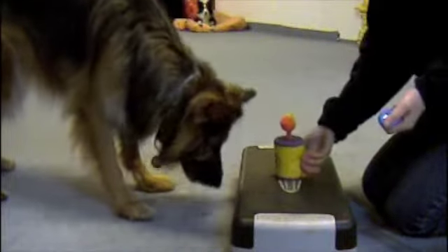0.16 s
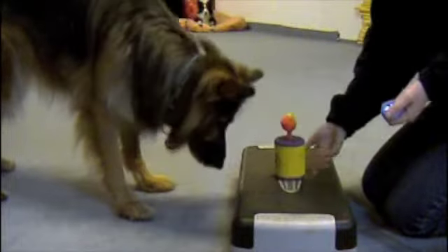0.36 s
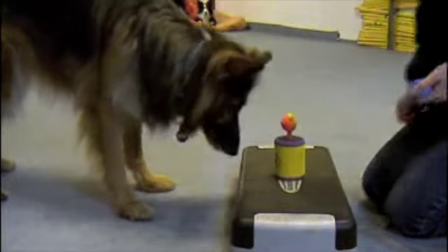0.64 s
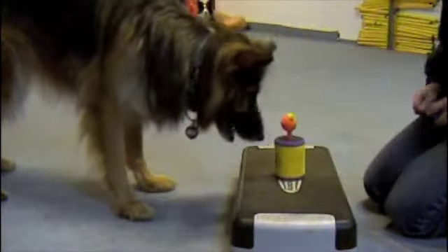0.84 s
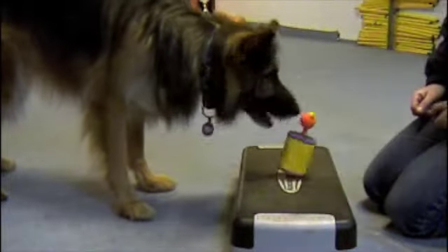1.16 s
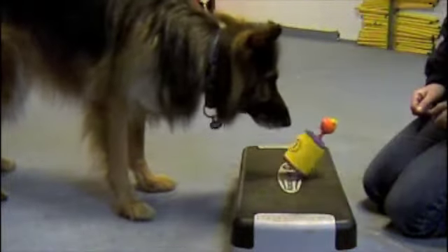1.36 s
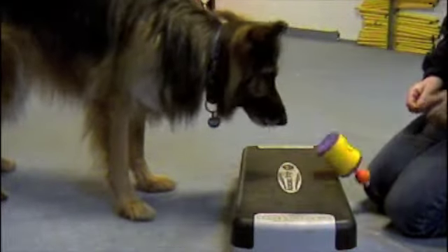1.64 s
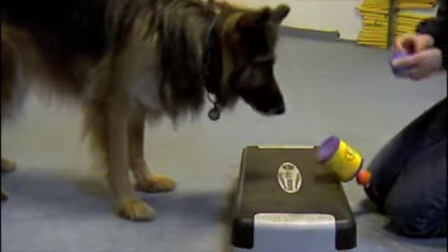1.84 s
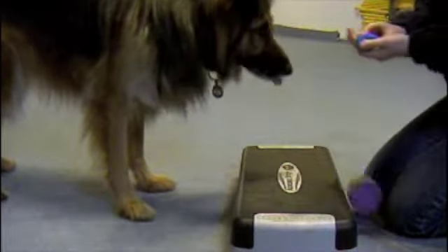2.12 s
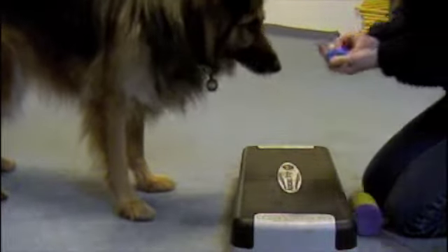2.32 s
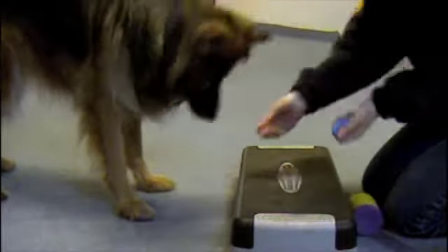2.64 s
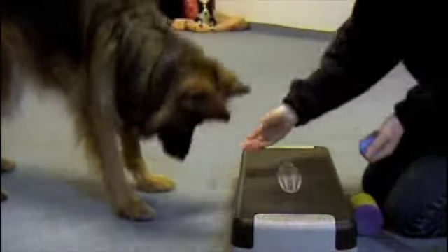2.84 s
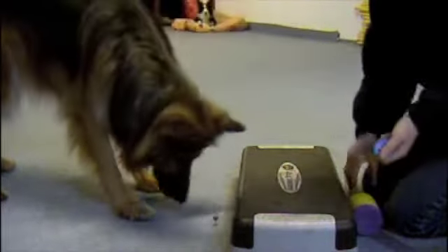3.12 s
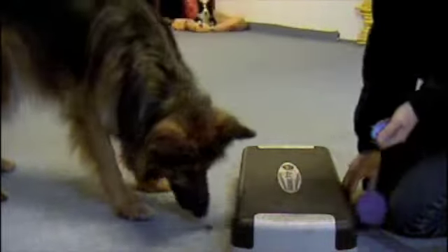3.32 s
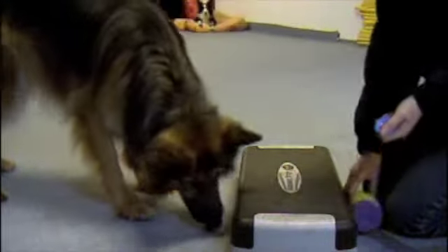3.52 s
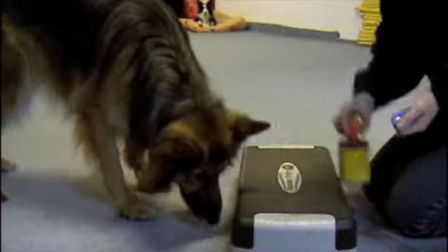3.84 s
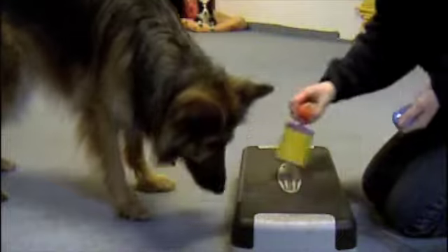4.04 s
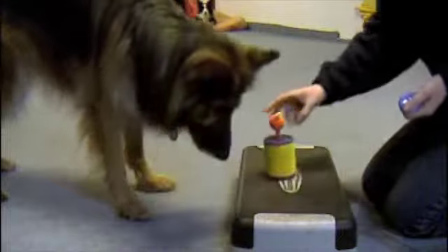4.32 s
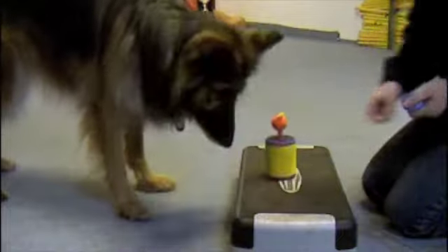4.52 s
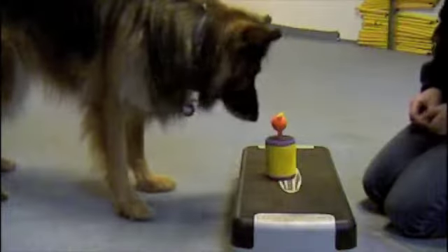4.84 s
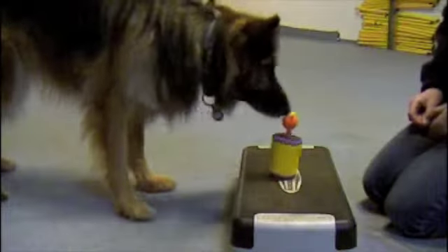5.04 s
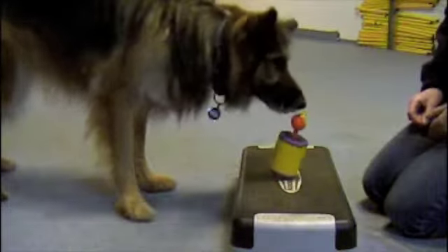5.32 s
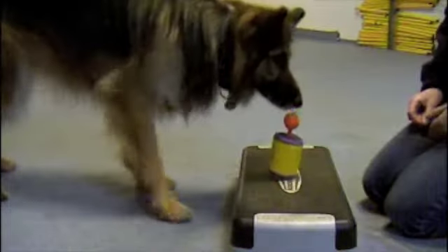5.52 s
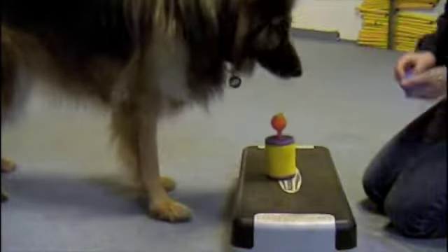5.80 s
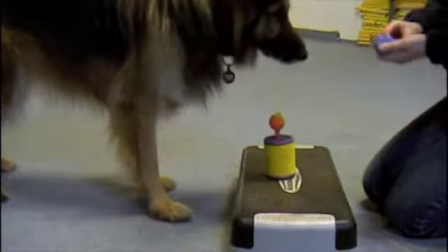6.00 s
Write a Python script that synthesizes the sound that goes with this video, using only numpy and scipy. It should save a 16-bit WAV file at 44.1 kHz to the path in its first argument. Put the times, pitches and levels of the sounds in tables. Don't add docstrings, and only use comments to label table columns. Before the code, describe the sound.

Quiet rustling, claw ticks and light plastic scuffs sit over steady camcorder hiss and faint whine. Twice a handheld clicker cuts through with a very loud, bright press and slightly softer release, distorting briefly and leaving a short echoing tail. Between them a light hollow toy topples, drops and is replaced on a plastic step, and a collar tag jingles faintly. Everything is near a stereo microphone in a reverberant room.

```python
import sys
import numpy as np
from scipy import signal
from scipy.fft import rfft, irfft
from scipy.io import wavfile

SR = 44100
rng = np.random.default_rng(int(sys.argv[2]) if len(sys.argv) > 2 else 0)


def volts(x):
    e = np.asarray(x, float) / 20
    return 10 ** e


def bounce(signal):
    frames = np.transpose(np.atleast_2d(signal))
    limited = np.clip(frames, -1, 1)
    pcm = np.round(limited * 32767).astype(np.int16)
    wavfile.write(sys.argv[1], SR, pcm)


N = 271682

# f/Hz, density/dB
HISS_MID = [(18, -12), (30, 14.5), (55, -20), (295, -2.5), (801, -3), (889, -7), (988, -7), (1500, -6),
            (3980, -15), (5590, -14), (6380, -23), (11100, -28), (16000, -34)]
HISS_SIDE = [(18, -27), (30, -5), (43, -7), (138, 6.5), (259, 6), (913, -7), (1040, -10), (1190, -8.5),
             (4190, -28.5), (5590, -26), (6380, -27), (13300, -34), (16000, -48)]
HISS_MID_DB, HISS_SIDE_DB = -54.5, -48
DRUM_HZ = 300
DRUM_ORDERS = [1, 3, 5, 6, 11, 13, 14, 15, 16, 17, 18, 19, 20, 23]
WHINE = [(-70, -81), (-63.5, -74), (-68.5, -82), (-70, -90), (-72, -65), (-77, -88), (-86.5, -69),
         (-69, -72), (-72, -80), (-70.5, -88), (-68, -58), (-69.5, -163.5), (-77.5, -69), (-84.5, -82)]
CAPSTAN_HZ = [2902, 3451, 3775, 4075, 4400, 4700, 5227, 5372, 5480, 5819]
CAPSTAN_DB = -78
# f/Hz, width/Hz, rms/dB
GEAR = [(5550, 210, -85.5), (10720, 580, -79), (8790, 200, -84)]

# t/s, level/dB
RUSTLE = [(0.0, -55.5), (0.9, -54), (1.5, -59), (2.6, -61), (3.3, -60), (3.5, -58), (4.8, -55.5),
          (5.1, -58.5), (6.16, -60.5)]
# f/Hz, density/dB
CLOTH = [(150, -15.5), (500, -0.5), (1200, 1.5), (2500, -3.5), (5000, -8.5), (12000, -28.5)]

# t/s, peak/dB, f/Hz, bright edge/dB
CLAWS = [(0.1955, -33.5, 2010, -49), (0.2188, -41, 1810, -45), (0.491, -46, 1800, -39.5),
         (0.5427, -35.5, 2170, -49), (0.5594, -35, 2340, -49), (0.5794, -35, 2080, -58),
         (0.7297, -37, 1910, -48), (0.8225, -37.5, 2060, -41), (0.832, -36, 1050, -40),
         (0.9179, -42, 1600, -46), (1.1523, -37.5, 3690, -54), (1.2823, -38, 2480, -55),
         (1.3204, -34.5, 1970, -48)]
TOY_TICKS = [(2.2095, -40, 3230, -65), (2.222, -36, 2900, -42), (2.2276, -34, 1380, -33),
             (2.2463, -30, 1700, -65), (3.4965, -37.5, 1340, -52), (3.5652, -39, 1610, -52),
             (3.751, -40, 2870, -44), (3.862, -30, 1850, -52), (3.8628, -38, 2720, -55),
             (3.97, -39, 1570, -44), (3.9855, -30.5, 1530, -39), (4.185, -44, 1020, -56),
             (4.253, -34, 1500, -52), (4.2643, -29.5, 1514, -44), (4.3757, -36, 1540, -57),
             (4.409, -39, 1570, -74)]
# t/s, peak/dB, bright edge/dB
TAG = [
    (4.6585, -29.5, -45),
    (4.6766, -34, -56),
    (4.708, -42, -62),
    (4.788, -31.5, -48),
    (4.803, -36.5, -59),
]
TAG_HZ = 3370
TICK_T60_S, FIZZ_DB = 0.028, -17
TICK_ROOM_DB, TICK_ECHO_DB = -9, -12

# t/s, length/s, centre f/Hz, level/dB
SCUFFS = [(.49, 0.062, 680, -55.5), (.84, 0.064, 1050, -54.5), (3.289, 0.12, 640, -54.5),
          (3.489, 0.11, 3700, -59.5), (4.195, 0.067, 348, -53), (4.26, 0.2, 1570, -54.5),
          (4.317, 0.079, 340, -57), (4.349, 0.037, 676, -53.5), (4.671, 0.054, 3320, -54)]
SCUFF_WIDTH = 1.15

# t/s, peak/dB, favoured f/Hz
KNOCKS = [(1.11, -53.5, 220), (1.594, -24.5, 318), (1.598, -35, 650), (1.644, -36, 348), (1.672, -43, 220),
          (2.248, -32, 271), (2.299, -48, 300), (2.329, -44, 300), (3.276, -39, 675), (3.58, -45, 240),
          (3.873, -51.5, 220), (3.984, -49.5, 674), (4.189, -42, 255), (4.2, -44, 330), (4.289, -43.5, 720),
          (6.042, -54, 230)]
# f/Hz, t60/s
BODY = [(228, 0.068), (330, 0.094), (505, 0.043), (688, 0.053)]
KNOCK_PAN_DB = [-9, -1, -1, 1]
KNOCK_NARROW_DB_PER_OCTAVE = 9
KNOCK_ROOM_DB, KNOCK_ECHO_DB = -7, -2.5

# t/s, peak/dB, left and right input charge under overload/dB
PRESS = [
    (1.4646, 6.15, -34, -28),
    (5.3652, 6.6, -35, -28.5),
]
RELEASE = [
    (1.71, 2.3, -27, -29),
    (5.69735, 2.86, -26, -29),
]
# f/Hz, level/dB, t60/s
PRESS_MODES = [(2210, -21.5, 0.016), (3010, -10.5, 0.011), (3570, -4.5, 0.013), (3903, -4, 0.0068),
               (4140, -1.5, 0.02), (4405, -3.5, 0.012), (4770, 2, 0.0067), (5750, -1, 0.004),
               (6670, -18.5, 0.015), (7730, -5.5, 0.0033), (10100, -16, 0.01), (11500, 7, 0.0016),
               (15500, -54, 0.0033)]
RELEASE_MODES = [(1990, -22.5, 0.0096), (2960, -11.5, 0.005), (3210, -11, 0.012), (3566, 0, 0.011),
                 (3740, -7.5, 0.007), (4500, -1, 0.004), (5300, -5, 0.0052), (5850, -8.5, 0.0057),
                 (6950, -16, .007), (9100, -19, 0.01), (10700, -19.5, 0.0064), (12050, -14, 0.0051),
                 (13600, -21, .002)]
# f/Hz, density/dB
PRESS_ALL_ROUND = [(590, -74), (1000, -23), (1240, -26.5), (1480, -14), (1710, -14), (2010, -16),
                   (2530, -11), (4100, 6), (5030, -6.5), (5200, -17.5), (6600, -12.5), (6800, -18.5),
                   (10400, -26), (14300, -40), (15500, -73)]
RELEASE_ALL_ROUND = [(590, -75), (1000, -34), (1430, -21.5), (1710, -11), (2530, -8), (3610, 7), (4000, -6),
                     (5100, -9), (6150, -9), (7400, -33), (8940, -22), (12500, -34.5), (13500, -49),
                     (14800, -58), (15500, -91)]
# f/Hz, level/dB, t60/s
TONGUE_RING = [
    (4115, -5, .012),
    (3620, -7, .009),
]
CRACK_DB, CRACK_HZ = -29, 11200
RELEASE_ECHO_DB = -12

# delay/ms, level/dB, left minus right/dB
ECHOES = [(6.61, -10, 4), (8.22, -11, 3), (11.37, -9, -1), (14.4, -8, 0), (16.57, -11, -2), (18.36, -14, 1),
          (20.35, -12, 3), (23.36, -13.5, 1.5), (26.4, -16, 3), (31.17, -12.5, 2), (33.24, -14, -3),
          (39.5, -18, 3), (54, -19, 0.5), (62.9, -15, -0.5)]
ECHO_CUT_HZ = 6600
# f/Hz, t60/s
ROOM_T60 = [(200, 0.54), (700, 0.66), (1500, 0.9), (3500, 0.74), (6000, 0.57), (10000, 0.39),
            (15000, 0.326)]
# f/Hz, side minus mid/dB
ROOM_SIDE = [(200, 3), (700, -15), (1300, -24), (2400, -12), (4400, -9), (8000, -3), (15000, 2)]
# f/Hz, level/dB
ROOM_COLOUR = [(200, -1.5), (700, -8.5), (1500, 3), (3500, 1), (7000, 1.5), (15000, 2.5)]
ROOM_DB, ROOM_RISE_S = -30, 0.0054

BASS_CUT_HZ, BALANCE_DB = 52, -1.42
CLIP_LEVEL, COUPLING_HZ, CUTOFF_HZ = 0.87, 1.51, 14000
JOLT_DB, JOLT_S = -32.5, 0.00243


def rms_one(x):
    return x / np.sqrt(np.mean(x ** 2) + 1e-20)


def at_hz(points, hz):
    table_hz, values = np.transpose(points)
    return np.interp(np.log(hz + 1), np.log(table_hz), values)


def filtered(x, order, hz, kind):
    return signal.sosfilt(signal.butter(order, hz, kind, fs=SR, output="sos"), x)


def drift(rate_hz):
    pole = np.exp(-80 * np.pi * rate_hz / SR)
    white = rng.standard_normal(N // 40 + 2002)
    slow = signal.lfilter([1], [1, -2 * pole, pole * pole], white)[2000:]
    return np.interp(np.arange(N) / 40, np.arange(len(slow)), rms_one(slow))


def coloured(spectrum):
    hz = np.fft.rfftfreq(N, 1 / SR)
    white = rng.standard_normal(N)
    return rms_one(irfft(rfft(white) * volts(at_hz(spectrum, hz)), N))


def add(track, start_s, sound):
    i = round(start_s * SR)
    track[..., i:i + sound.shape[-1]] += sound[..., :N - i]


def ringing(hz, db, t60_s, rise_s):
    t = np.arange(round(t60_s * SR)) / SR
    envelope = volts(db - 60 * t / t60_s) * (1 - np.exp(-t / rise_s))
    return envelope * np.sin(2 * np.pi * hz * t)


def stereo(mid, side):
    return np.array([mid + side, mid - side])


def recorder_noise():
    t = np.arange(N) / SR
    mid = volts(HISS_MID_DB) * coloured(HISS_MID)
    side = volts(HISS_SIDE_DB) * coloured(HISS_SIDE)
    wobble = [drift(2.9), drift(8.6), drift(7.5)]
    lines = [(order * DRUM_HZ, *db) for order, db in zip(DRUM_ORDERS, WHINE)]
    lines += [(hz, CAPSTAN_DB, CAPSTAN_DB - 10) for hz in CAPSTAN_HZ]
    phases = rng.uniform(0, 2 * np.pi, (len(lines), 2))
    for k, ((hz, mid_db, side_db), phase) in enumerate(zip(lines, phases)):
        turn = 2 * np.pi * hz * t
        height = np.sqrt(2) * volts(2.3 * wobble[k % 3])
        mid = mid + height * volts(mid_db) * np.sin(turn + phase[0])
        side = side + height * volts(side_db) * np.sin(turn + phase[1])
    beat = 1 + 0.37 * np.cos(2 * np.pi * DRUM_HZ * t)
    for hz, width_hz, db in GEAR:
        band_hz = [hz - width_hz / 2, hz + width_hz / 2]
        noise = filtered(rng.standard_normal((2, N)), order=1, hz=band_hz, kind="band")
        gear = volts(db) * beat * rms_one(noise)
        mid, side = mid + gear[0], side + gear[1]
    return stereo(mid, side)


def rustle():
    s, db = np.transpose(RUSTLE)
    level_db = np.interp(np.arange(N) / SR, s, db) + 1
    gain = volts(level_db + 2.0 * drift(10.0))
    return stereo(gain * coloured(CLOTH), 0.4 * gain * coloured(CLOTH))


def ticks():
    out, t = np.zeros(N), np.arange(round(SR / 20)) / SR
    rows = CLAWS + TOY_TICKS + [(s, db, TAG_HZ, edge_db) for s, db, edge_db in TAG]
    noise = rng.standard_normal((len(rows), 3, len(t)))
    for (s, db, hz, edge_db), (scratch, crisp, fizz) in zip(rows, noise):
        scratch = filtered(scratch, order=2, hz=[hz * 0.51, hz * 1.5], kind="band")
        crisp = filtered(crisp, order=2, hz=[3500, 8000], kind="band")
        fizz = filtered(fizz, order=2, hz=[8000, 14000], kind="band")
        t60_s = TICK_T60_S * np.sqrt(2000 / hz)
        add(out, s, ringing(hz, db - 3.5, t60_s, rise_s=0.00072))
        add(out, s, volts(db + 1.0 - 55 * t / TICK_T60_S) * scratch)
        add(out, s, volts(edge_db + 4.5 - 60 * t / 0.011) * (crisp + volts(FIZZ_DB) * fizz))
    return out * volts([[-0.3], [0.3]])


def scuffs():
    out, lumps = np.zeros(N), volts(1.8 * drift(40))
    noises = rng.standard_normal((len(SCUFFS), SR // 2))
    for (s, length_s, hz, db), noise in zip(SCUFFS, noises):
        t = np.arange(round(2 * length_s * SR)) / SR
        band_hz = [hz / SCUFF_WIDTH, hz * SCUFF_WIDTH]
        rub = rms_one(filtered(noise, order=2, hz=band_hz, kind="band"))[:len(t)]
        envelope = (1 - np.exp(-t / 0.0054)) / (1 + (t / length_s) ** 6)
        add(out, s, volts(db) * rub * envelope)
    return out * lumps


def knocks():
    out, t = np.zeros((2, N)), np.arange(round(SR / 20)) / SR
    noise = rng.standard_normal((len(KNOCKS), len(t)))
    slaps = filtered(noise, order=2, hz=[170, 1000], kind="band")
    detunes = rng.normal(1, 0.06, (len(KNOCKS), 4))
    for (s, db, favoured_hz), detune, slap in zip(KNOCKS, detunes, slaps):
        add(out, s, slap * volts(db + 6 - 60 * t / 0.078))
        for (hz, t60_s), pan_db, factor in zip(BODY, KNOCK_PAN_DB, detune):
            loss_db = KNOCK_NARROW_DB_PER_OCTAVE * abs(np.log2(hz / favoured_hz))
            mode = ringing(hz * factor, db - loss_db + 8, t60_s, rise_s=0.0019)
            add(out, s, volts([[pan_db / 2], [-pan_db / 2]]) * mode)
    return filtered(out + 1e-18, order=4, hz=138, kind="high")


def clicker():
    direct, all_round = np.zeros(N), np.zeros(N)
    hz_axis = np.fft.rfftfreq(512, 1 / SR)
    crack = filtered(np.eye(1, 64)[0], order=2, hz=CRACK_HZ, kind="high")
    shapes = ((PRESS, PRESS_MODES, PRESS_ALL_ROUND, 21.5, TONGUE_RING[0]),
              (RELEASE, RELEASE_MODES, RELEASE_ALL_ROUND, 18.5, TONGUE_RING[1]))
    for snaps, modes, colour, tail_db, ring in shapes:
        burst = np.roll(irfft(volts(at_hz(colour, hz_axis))), 128)
        for s, db, *_ in snaps:
            add(all_round, s, volts(db + tail_db) * burst)
            add(all_round, s, volts(db) * ringing(*ring, rise_s=0.00056))
            add(direct, s, volts(db + CRACK_DB) * crack)
            for (hz, mode_db, t60_s), chance_db in zip(modes, rng.normal(0, 1.0, len(modes))):
                lead_s = round(SR / hz / 2) / SR
                add(direct, s - lead_s, ringing(hz, db + mode_db + chance_db, t60_s, rise_s=0.00031))
    return direct, all_round


def echoes(x):
    reply = np.full((2, round(SR / 10)), 1e-18)
    for (ms, db, pan_db), sign in zip(ECHOES, rng.choice([-1, 1], len(ECHOES))):
        lag = round(ms * SR / 1000)
        reply[0, lag] += sign * volts(db + pan_db / 2)
        reply[1, lag + round(pan_db / 2)] += sign * volts(db - pan_db / 2)
    reply = filtered(reply, order=2, hz=[500, ECHO_CUT_HZ], kind="band")
    return signal.fftconvolve(x, reply, axes=1)[:, :N]


def room(x):
    t = np.arange(SR) / SR
    reply = np.zeros((2, SR))
    edges_hz = 100 * 2 ** np.arange(0, 7.6, 0.5)
    white = rng.standard_normal((2, 2, SR))
    rise = 1 - np.exp(-(t / ROOM_RISE_S) ** 2)
    for k, (low, high) in enumerate(zip(edges_hz, edges_hz[1:])):
        mid, side = filtered(white[k % 2], order=2, hz=[low, high], kind="band")
        hz = np.sqrt(low * high)
        level_db = ROOM_DB + at_hz(ROOM_COLOUR, hz)
        decay = rise * volts(level_db - 60 * t / at_hz(ROOM_T60, hz))
        reply += stereo(mid, side * volts(at_hz(ROOM_SIDE, hz))) * decay
    return signal.fftconvolve(x, reply, axes=1)[:, :N]


def scene():
    knock, tick = knocks(), ticks()
    snaps, snaps_all_round = clicker()
    flips_s = sorted(s - 0.002 for s, *_ in PRESS + RELEASE)
    released = np.searchsorted(flips_s, np.arange(N) / SR) % 2 == 0
    thrown = snaps * volts(RELEASE_ECHO_DB * released)
    early = echoes(thrown + volts(KNOCK_ECHO_DB) * knock + volts(TICK_ECHO_DB) * tick)
    late = room(snaps_all_round + volts(KNOCK_ROOM_DB) * knock + volts(TICK_ROOM_DB) * tick)
    whole = recorder_noise() + rustle() + tick + scuffs() + knock + snaps + early + late
    balance = volts([[BALANCE_DB / 2], [-BALANCE_DB / 2]])
    return filtered(whole, order=4, hz=BASS_CUT_HZ, kind="high") * balance


def top_cut(x):
    return signal.sosfilt(signal.butter(12, 16780, fs=SR, output="sos"), x)


def record(dry):
    level_db = 20 * np.log10(np.abs(dry).max(axis=0) + 1e-9)
    fall_db = 42.7 * np.arange(N) / SR
    held_db = np.maximum.accumulate(level_db + fall_db) - fall_db
    over_db = np.maximum(held_db + 13.0, 0)
    attack = np.exp(-1 / (0.0039 * SR))
    x = dry * volts(-0.3 * signal.lfilter([1 - attack], [1, -attack], over_db))
    x = CLIP_LEVEL * x / (0.5 + np.abs(x / CLIP_LEVEL) ** 6) ** (1 / 6)
    charge = np.zeros((2, N))
    for s, db, left_db, right_db in PRESS + RELEASE:
        charge[:, round((s + 0.0006) * SR):] += volts([[left_db], [right_db]])
        add(x, s, volts(JOLT_DB + db) * np.hanning(round(JOLT_S * SR)))
    charge = signal.lfilter([0.2], [1, -0.8], charge)
    x = x + filtered(charge, order=2, hz=COUPLING_HZ, kind="high")
    mix = filtered(x, order=6, hz=CUTOFF_HZ, kind="low")
    return top_cut(mix)


dry = scene()
out = record(dry)
bounce(out)
```